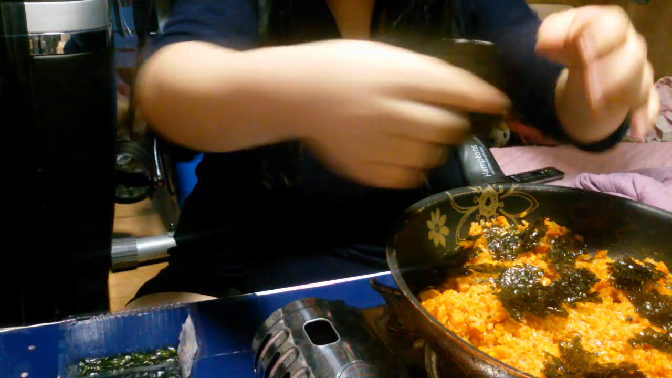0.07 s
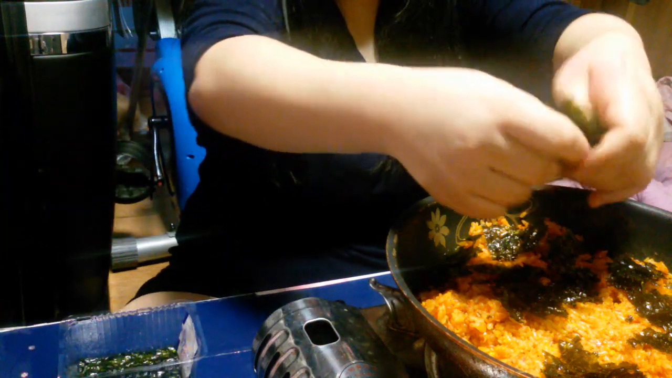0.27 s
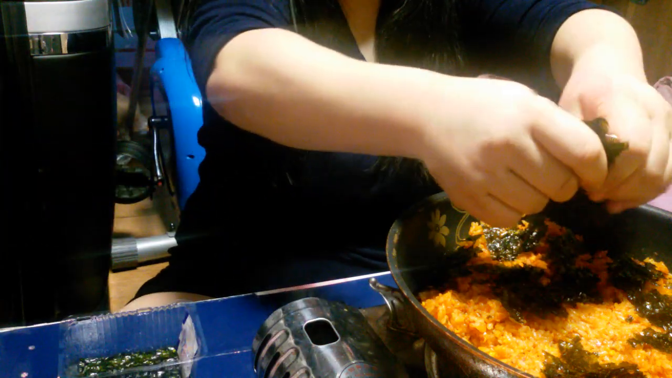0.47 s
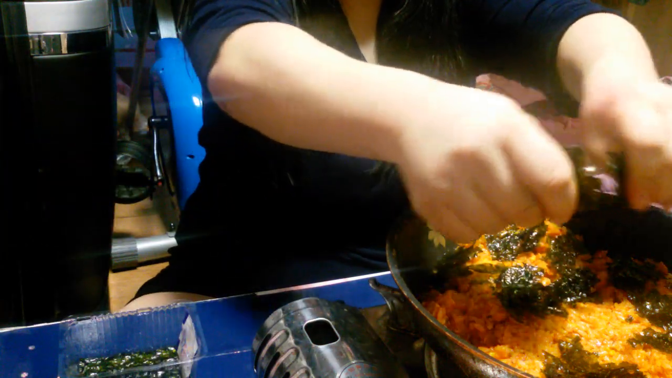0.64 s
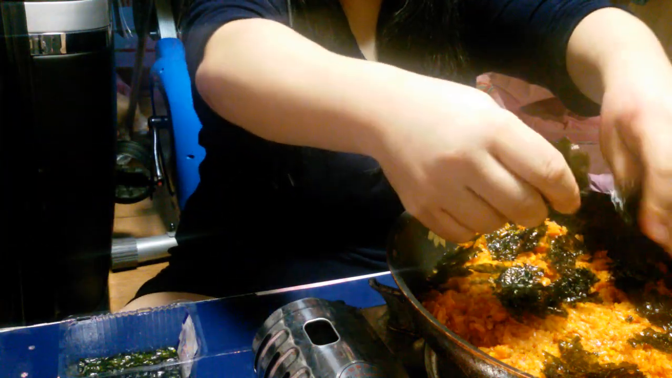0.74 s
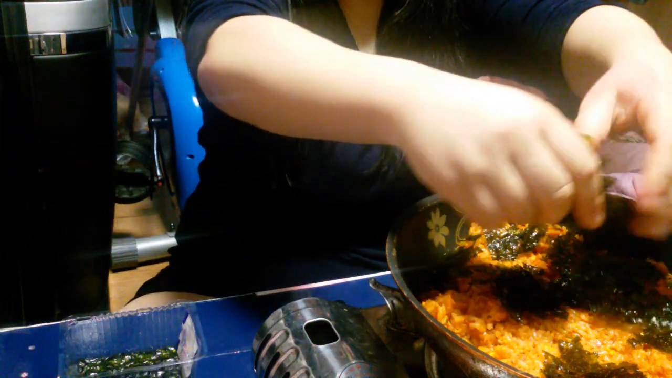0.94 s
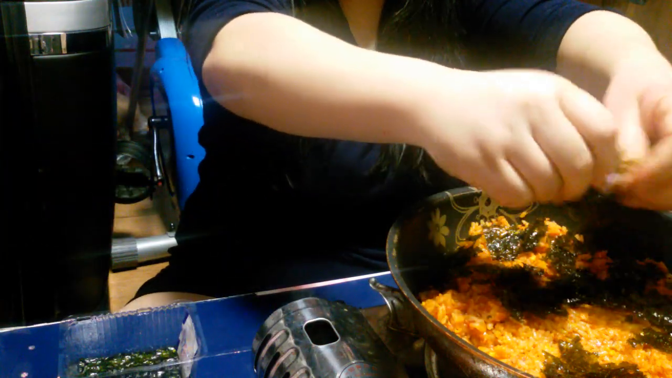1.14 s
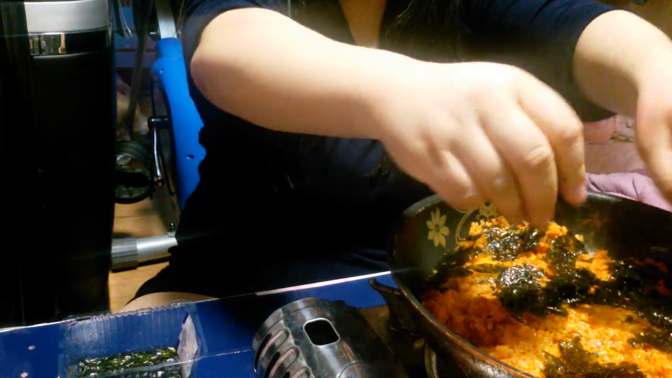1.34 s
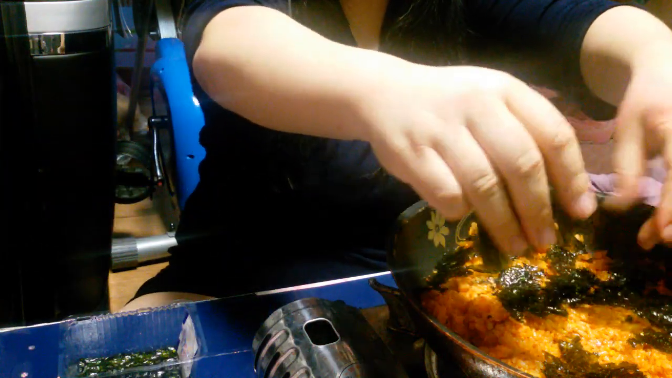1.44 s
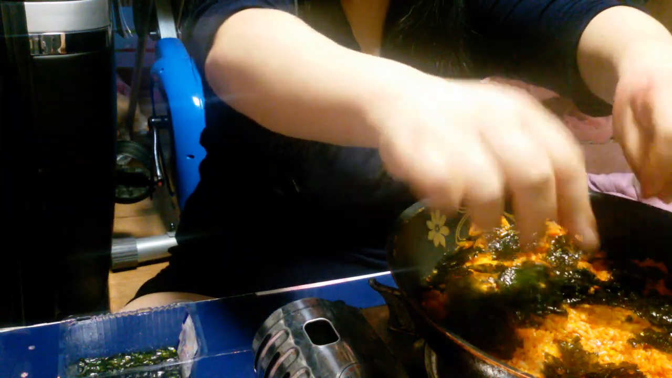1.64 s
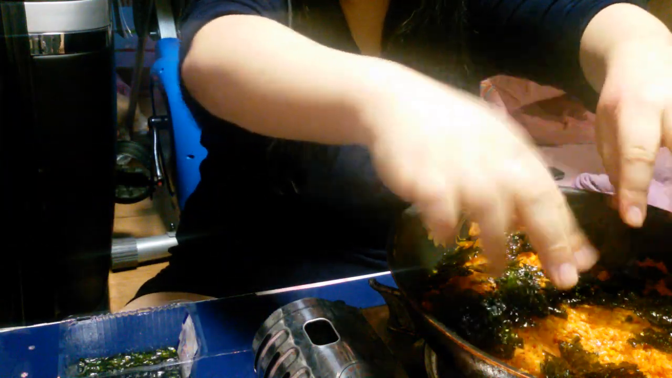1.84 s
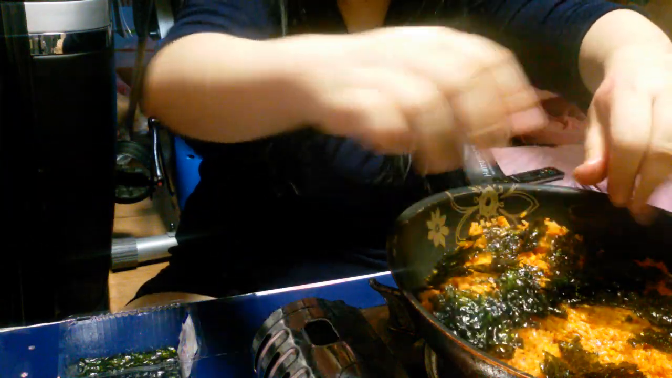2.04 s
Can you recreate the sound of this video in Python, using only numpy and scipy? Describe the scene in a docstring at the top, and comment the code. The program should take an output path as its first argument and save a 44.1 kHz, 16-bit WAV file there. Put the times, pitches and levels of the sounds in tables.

```python
"""Small kitchen, mono: crisp dried seaweed is crumbled by hand over a pan. Each squeeze sets off a swarm of
tiny fractures, made of random clicks split into bands. Larger flakes snap as noise bursts, clean breaks tick as
filtered pulses, fingers touching the pan's contents give dull knocks. The room answers with a short noise tail.
Behind: coloured-noise rumble and handling rustle, a mains hum with a second steady tone, and a faint, unsteady
electronic whine."""
import sys
import numpy as np
from scipy import signal
from scipy.fft import rfft, irfft
from scipy.io import wavfile
from scipy.ndimage import uniform_filter1d

SR = 44100
rng = np.random.default_rng(int(sys.argv[2]) if len(sys.argv) > 2 else 0)


def store_wav(level_fs):
    """Save 16-bit WAV to argv[1]."""
    pcm = np.round(np.clip(np.atleast_2d(level_fs), -1, 1) * 32767)
    wavfile.write(sys.argv[1], SR, pcm.T.astype(np.int16))


N = 90405
TIME_S = np.arange(N) / SR


def from_db(db):
    """Decibels to amplitude gain."""
    return 10 ** (np.asarray(db) / 20)


def rms_one(x):
    """Scale to unit RMS."""
    return x / np.sqrt(np.mean(x ** 2) + 1e-20)


def at_hz(points, hz):
    """Interpolate (frequency [Hz], level [dB]) points on a log-frequency axis."""
    point_hz, point_db = np.transpose(points)
    return np.interp(np.log(hz + 1e-9), np.log(point_hz), point_db)


def at_time(points):
    """Interpolate (time [s], level [dB]) points over the scene."""
    return np.interp(TIME_S, *np.transpose(points))


def band(x, low_hz, high_hz):
    """Causal Butterworth band-pass."""
    sos = signal.butter(2, [low_hz, high_hz], "band", fs=SR, output="sos")
    return signal.sosfilt(sos, x + 1e-18)


def resonance(x, hz, width_hz):
    """Two-pole resonance with about unit gain at its peak."""
    r = np.exp(-np.pi * width_hz / SR)
    numerator = np.array([1, 0, -1]) * (1 - r * r) / 2
    denominator = [1, -2 * r * np.cos(2 * np.pi * hz / SR), r * r]
    return signal.lfilter(numerator, denominator, x + 1e-18)


def noise(spectrum):
    """Steady noise shaped by a spectrum, unit RMS."""
    gain = from_db(at_hz(spectrum, np.fft.rfftfreq(N, 1 / SR)))
    return rms_one(irfft(rfft(rng.standard_normal(N)) * gain, N))


def drift(corner_hz):
    """Smooth random wander: white noise through two equal real poles, unit RMS."""
    r = np.exp(-2 * np.pi * corner_hz / SR)
    wander = signal.lfilter([1], [1, -2 * r, r * r], rng.standard_normal(N + SR))
    return rms_one(wander[SR:])  # first second dropped: filter settling


def add(out, start_s, sound):
    """Mix a short sound in at a time."""
    i = max(int(start_s * SR), 0)
    out[i:i + len(sound)] += sound[:max(N - i, 0)]


# room rumble spectrum: (frequency [Hz], relative density [dB per Hz])
RUMBLE_SPECTRUM = [(25, -30), (70, -13), (125, -5.5), (250, -7), (450, -10.5), (600, -15.5), (2000, -19),
                   (5000, -21), (7500, -23.5), (14500, -23)]
RUMBLE_RMS_DB = -61


def rumble():
    """Steady room noise, strongest in the lows."""
    return from_db(RUMBLE_RMS_DB) * noise(RUMBLE_SPECTRUM)


# steady tones: (frequency [Hz], RMS level [dB])
HUM_TONES = [(120, -69.5), (409, -70)]


def hum():
    """Steady sines, random starting phase."""
    out = np.zeros(N)
    for hz, db in HUM_TONES:
        out += from_db(db) * rms_one(np.sin(2 * np.pi * (hz * TIME_S + rng.random())))
    return out


# whine RMS level: (time [s], level [dB])
WHINE_CURVE = [(0, -59), (1.55, -56.5), (1.9, -60), (2.05, -62)]
REST_HZ, MEAN_SQUARE_SAG_HZ, SAG_LIMIT = 6370, 129, 2.4  # limit in multiples of that sag
JITTER_RMS_HZ, JITTER_HZ_PER_SAG_HZ = 79, .6  # jitter at rest; extra as it sags
SAG_CORNER_HZ, JITTER_CORNER_HZ = 45, 351


def whine():
    """One thin electronic tone that keeps sagging from its resting pitch, rougher as it sags."""
    sag_hz = MEAN_SQUARE_SAG_HZ * np.minimum(drift(SAG_CORNER_HZ) ** 2, SAG_LIMIT)
    jitter_hz = (JITTER_RMS_HZ + JITTER_HZ_PER_SAG_HZ * sag_hz) * drift(JITTER_CORNER_HZ)
    pitch_hz = REST_HZ - sag_hz + jitter_hz
    tone = np.sin(2 * np.pi * np.cumsum(pitch_hz) / SR)
    return from_db(at_time(WHINE_CURVE)) * rms_one(tone)


# sleeves and hands moving: (frequency [Hz], relative density [dB per Hz])
RUSTLE_SPECTRUM = [(30, -5.5), (70, -1.5), (130, -1.5), (300, -6), (700, -10.5), (2000, -32)]
# rustle level before the trim: (time [s], level [dB])
RUSTLE_CURVE = [(0, -67.5), (.2, -53.5), (.5, -55), (.85, -50.5), (1.45, -54.5), (1.65, -58), (1.78, -57),
                (2.05, -73)]
RUSTLE_TRIM_DB = -5.5


def rustle():
    """Soft low noise of sleeves and hands, swelling and fading."""
    return from_db(at_time(RUSTLE_CURVE) + RUSTLE_TRIM_DB) * noise(RUSTLE_SPECTRUM)


ROOM_DB, ROOM_T60_S, ROOM_LOWPASS_HZ, ROOM_GAP_S = -4.5, 0.17, 8640, 0.0025
HAND_MOVE_S, HAND_PLACES = .06, 6


def kitchen(x):
    """Decaying, slightly dull reflections; their pattern changes as the hands move."""
    t = TIME_S[:SR // 2]
    out = np.zeros(N)
    place = (TIME_S / HAND_MOVE_S).astype(int) % HAND_PLACES  # cycles through the places
    lowpass = signal.butter(2, ROOM_LOWPASS_HZ, fs=SR)
    for k in range(HAND_PLACES):
        tail = rng.standard_normal(len(t)) * from_db(-60 * t / ROOM_T60_S) * (t > ROOM_GAP_S)
        tail = signal.lfilter(*lowpass, tail / np.linalg.norm(tail))
        out += signal.fftconvolve(x * (place == k), tail)[:N]
    return from_db(ROOM_DB) * out


# fingers touching the contents of the pan: (time [s], peak level [dB], pitch [Hz])
TOUCH_KNOCKS = [(1.199, -39.5, 1020), (1.228, -40, 880), (1.427, -39.5, 833)]
KNOCK_WIDTH_HZ, KNOCK_DECAY_S = 310, 0.0037


def knocks():
    """Fingers touch the pan's contents: a decaying noise burst through two equal resonances, a dull knock."""
    out, t = np.zeros(N), TIME_S[:SR // 25]
    for start_s, db, hz in TOUCH_KNOCKS:
        burst = rng.standard_normal(len(t)) * np.exp(-t / KNOCK_DECAY_S)
        knock = resonance(burst, hz, KNOCK_WIDTH_HZ)
        knock = resonance(knock, hz, KNOCK_WIDTH_HZ)
        add(out, start_s, from_db(db) * knock / np.abs(knock).max())
    return out


# clean breaks: (time [s], drive before the boost [dB], brightest [Hz], splinters re pulse [dB])
CLEAN_BREAKS = [(0.1295, -15, 6500, -4), (0.569, -14, 5500, -28), (0.585, -8, 7000, -12),
                (0.7362, -29, 11100, -18), (0.7456, -23, 10000, -22), (1.2546, -12, 9600, 4),
                (1.2919, -5.5, 9100, -14), (1.5165, -33, 9000, 6)]
TICK_BOOST_DB, TICK_WIDTH_HZ, SPLINTER_DECAY_S = 3, 6100, 0.00025


def ticks():
    """One clean break: a sharp pulse and a very brief splinter noise, through a broad resonance."""
    out, t = np.zeros(N), TIME_S[:SR // 50]
    for start_s, db, hz, splinter_db in CLEAN_BREAKS:
        splinters = rng.standard_normal(len(t)) * np.exp(-t / SPLINTER_DECAY_S)
        crack = (t == 0) + from_db(splinter_db) * splinters
        add(out, start_s, from_db(db + TICK_BOOST_DB) * resonance(crack, hz, TICK_WIDTH_HZ))
    return out


# flakes: (time [s], level before register gain [dB], body re middle [dB], crisp re middle [dB])
FLAKE_SNAPS = [(0.0333, -24, -21, -21), (0.1536, -22.5, -18.5, -11.5), (0.2064, -31, -21, -6.5),
               (0.2276, -15, -20.5, -16), (0.2621, -22.5, -15, -10.5), (0.297, -17, -16, -26),
               (0.3207, -8.5, -22, -19), (0.4297, -18, -17, -15), (0.4402, -17, -24, -10),
               (0.453, -20, -22, -20), (0.479, -16, -19, -17), (0.5032, -17, -39, -20),
               (0.5262, -20, -9, -19), (0.5609, -16, -11.5, -31), (0.614, -6.5, -17.5, -16),
               (0.6838, -23, -25, -23), (0.7459, -19.5, -25, -14), (0.7604, -22.5, -35, -15),
               (0.7763, -20, -27, -11), (0.8042, -26, -17, -6), (0.8552, -25, -19, -15),
               (0.8871, -30, -19, -12), (0.9696, -33, -17, -15), (1.0093, -26, -32, -34),
               (1.0594, -27.5, -18.5, -12), (1.1403, -19, -17, -28), (1.1973, -16, -14, -15),
               (1.3092, -39, -37, -10), (1.3992, -19, -22, -12), (1.4248, -15, -15.5, -9),
               (1.515, -23.5, -19.5, -20), (1.5402, -32, -31, -15), (1.703, -39, -10.5, -21),
               (1.8108, -48.5, -4, -24)]
# body, middle, crisp registers: (low edge [Hz], high edge [Hz])
SNAP_BANDS = [(1300, 3600), (4400, 7300), (7800, 16000)]
# gain per register: (gain [dB])
SNAP_GAINS_DB = [-14.5, -23, -16]
# die-away per register, before filtering: (time constant [s])
SNAP_DECAYS_S = [0.0018, 0.002, 0.0027]
SNAP_DELAY_S = .001  # each snap sounds 1 ms after its listed time


def snaps():
    """A crack runs through a flake in a few milliseconds: decaying noise in three registers."""
    out, t = np.zeros(N), TIME_S[:SR // 50]
    for snap_s, db, body_db, crisp_db in FLAKE_SNAPS:
        tints_db = (body_db, 0, crisp_db)
        for (low, high), tint_db, gain_db, decay_s in zip(
                SNAP_BANDS, tints_db, SNAP_GAINS_DB, SNAP_DECAYS_S):
            crack = rng.standard_normal(len(t)) * np.exp(-t / decay_s)
            level = from_db(db + tint_db + gain_db)
            add(out, snap_s + SNAP_DELAY_S, level * rms_one(band(crack, low, high)))
    return out


# squeezes; rise and fall each span 20 dB; body and crispness are tints before their band weights:
# (greatest force time [s], level [dB], rise [s], fall [s], body [dB], crispness [dB])
HAND_SQUEEZES = [(0.045, -54, .015, .12, 0, -5), (0.160, -47, .025, .14, -3, -3),
                 (0.245, -43, .04, .12, -4, -4), (0.315, -32.5, .075, .22, 0, -1),
                 (0.510, -30, .15, .12, -2, 1), (0.570, -27, .12, .1, 0, 0),
                 (0.618, -25, .045, .065, 4, -2), (0.685, -45, .03, .12, 1, -3),
                 (0.750, -45, .02, .08, -6, -3), (0.808, -36, .07, .145, -2, 1),
                 (0.930, -52, .05, .15, 0, 1), (1.010, -52, .08, .25, 0, -2), (1.142, -35, .065, .08, 2, 1),
                 (1.220, -32.5, .055, .105, 3, 1), (1.305, -48, .03, .05, -6, 2),
                 (1.402, -34.5, .035, .06, 0, 0), (1.428, -36, .025, .075, 2, 0),
                 (1.535, -53, .04, .15, -3, -3), (1.650, -60, .1, .2, 0, -2), (1.782, -55, .06, .1, -1, 2)]
# fracture colour: (frequency [Hz], relative density [dB per Hz])
FRACTURE_SPECTRUM = [(200, -16.5), (700, -19.5), (1050, -7.5), (1550, -15), (2100, -5.5), (2800, -5),
                     (3300, -4), (3900, -7.5), (5100, 2.5), (6400, 0), (8500, -6), (12000, -6), (14500, -5)]
FORCED_RATE_HZ, RATE_FORCE_DB, RATE_EXPONENT, IDLE_RATE_HZ = 3800, -30.5, .45, 150
SIZE_SPREAD_DB, SIZE_LIMIT = 3, 6.3  # mean of the uncapped spread; cap in multiples of it
COLOUR_SPREAD = 0.31  # random gain of each click per band, re 1
PATCH_RMS_DB, PATCH_CORNER_HZ = 1.9, 14.2  # each band swells on its own


def crumbling():
    """Force raises the rate and level of tiny fractures, each with a colour of its own."""
    peak_s, db, rise_s, fall_s, body_db, crisp_db = np.transpose(HAND_SQUEEZES)[:, :, None]
    slope = np.maximum((peak_s - TIME_S) / rise_s, (TIME_S - peak_s) / fall_s).clip(0, 10)
    powers = from_db(db - 20 * slope) ** 2
    force = np.sqrt(powers.sum(0))
    rate_hz = FORCED_RATE_HZ * (force / from_db(RATE_FORCE_DB)) ** RATE_EXPONENT + IDLE_RATE_HZ

    sizes = from_db(SIZE_SPREAD_DB * np.minimum(rng.exponential(1, N), SIZE_LIMIT))
    clicks = (rng.random(N) < rate_hz / SR) * sizes * rng.choice([-1, 1], N)
    # even out local click power, so the squeezes alone set the level
    local_power = np.abs(uniform_filter1d(clicks ** 2, size=700))
    clicks = clicks / np.sqrt(local_power + 0.0072)

    edges_hz = np.geomspace(200, 16000, 25)
    centres_hz = np.sqrt(edges_hz[1:] * edges_hz[:-1])
    gains = from_db(at_hz(FRACTURE_SPECTRUM, centres_hz)) * np.sqrt(np.diff(edges_hz))
    gains = gains / np.linalg.norm(gains)
    out = np.zeros(N)
    for low, high, hz, gain in zip(edges_hz[:-1], edges_hz[1:], centres_hz, gains):
        body_weight = at_hz([(2500, 0.37), (5000, 0)], hz)
        crisp_weight = at_hz([(6000, 0), (9500, 1)], hz)
        tint_db = body_db * body_weight + crisp_db * crisp_weight
        level = np.sqrt((powers * from_db(tint_db) ** 2).sum(0))
        colour = COLOUR_SPREAD * rng.standard_normal(N) + rng.choice([-1, 1], N)
        patches = from_db(PATCH_RMS_DB * drift(PATCH_CORNER_HZ))
        out += gain * level * rms_one(patches * band(clicks * colour, low, high))
    return out


def scene():
    """Background, seaweed and its reflections, the same in both channels."""
    background = rumble() + hum() + whine() + rustle()
    seaweed = knocks() + ticks() + snaps() + crumbling()
    return np.tile(background + kitchen(seaweed) + seaweed, (2, 1))


def record(dry):
    """Steep elliptic low-pass at 14.5 kHz."""
    return signal.sosfilt(signal.ellip(10, .2, 70, 14500, fs=SR, output="sos"), dry)


dry = scene()
out = record(dry)
store_wav(out)
```